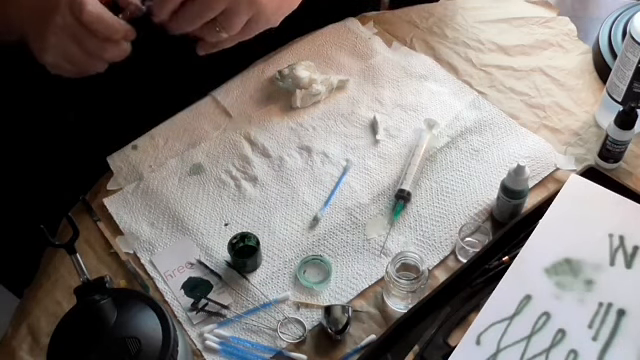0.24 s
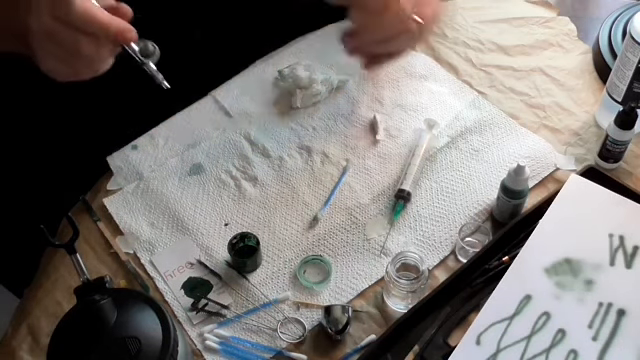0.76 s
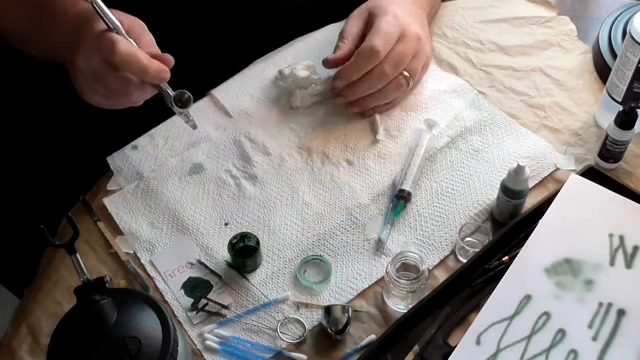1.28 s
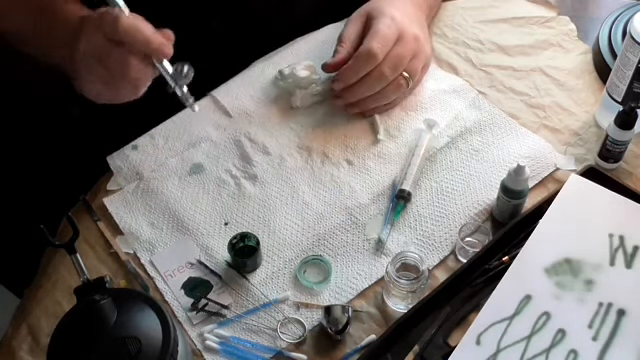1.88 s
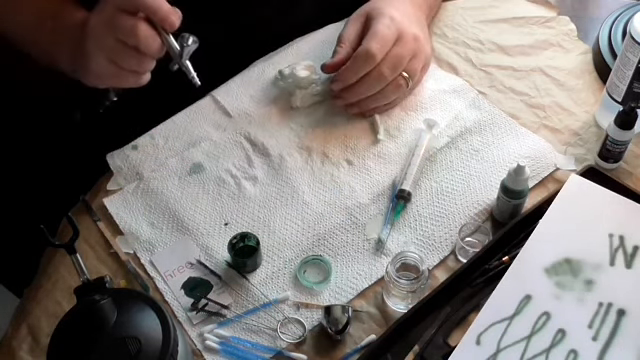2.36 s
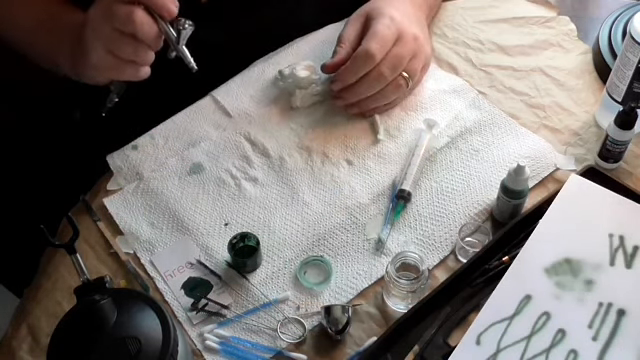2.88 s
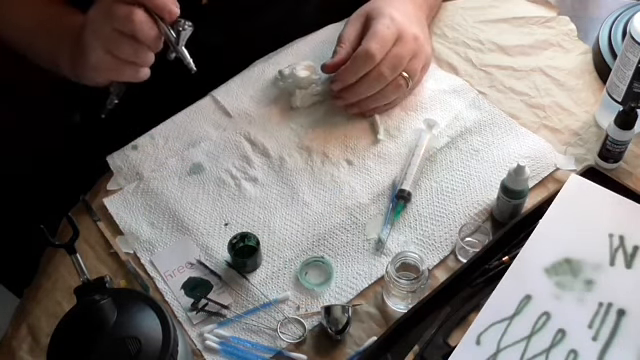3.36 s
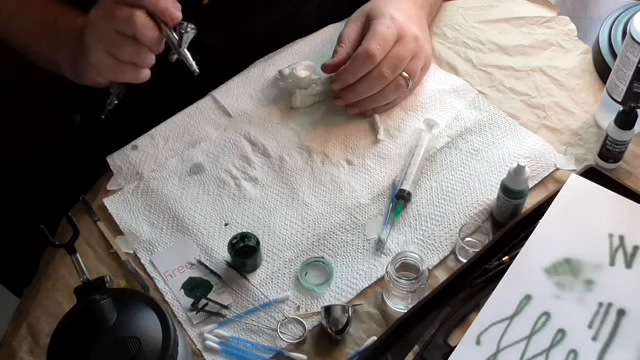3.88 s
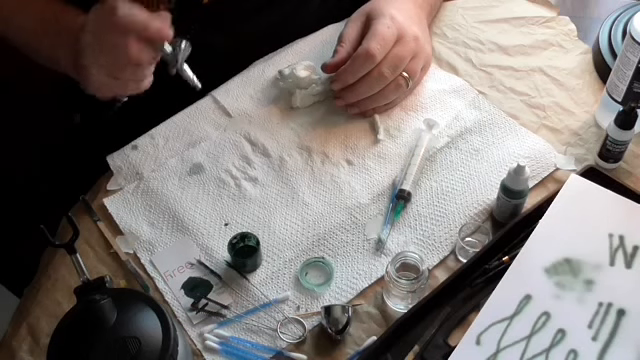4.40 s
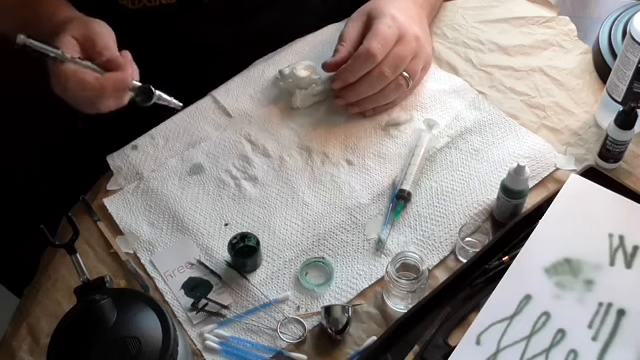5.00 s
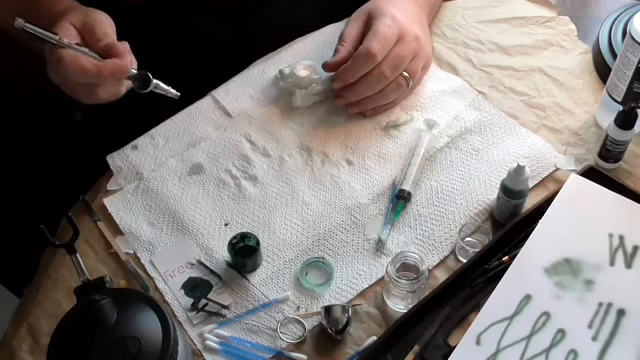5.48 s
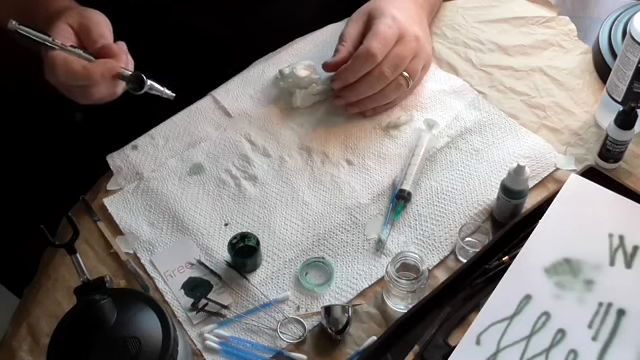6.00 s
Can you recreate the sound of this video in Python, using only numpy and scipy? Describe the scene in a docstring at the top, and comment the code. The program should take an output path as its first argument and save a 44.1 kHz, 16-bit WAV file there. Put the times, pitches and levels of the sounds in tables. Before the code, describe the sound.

Close stereo pickup at a hobby bench with faint low room rush. Metal parts click twice, a trigger clacks, and compressed air rushes out, first brushing paper with a duller undertone, then lifted away. A compressor hums and rattles rapidly below from just after the hiss starts, with faint fading whines. Two brief air breaks expose the motor before the hiss resumes to the end.

```python
"""A hobby bench in a small room: metal fittings click twice, then an airbrush trigger is pressed.
Filtered noise makes the jet, first at a paper towel, then off it, with two short breaks in the air.
Struck, damped metal makes the clicks; shaft multiples and valve puffs make a small piston compressor
that starts and chugs on underneath, with fading whines. Room noise and reflections surround it all."""
import sys
import numpy as np
from scipy import signal
from scipy.fft import rfft, irfft
from scipy.io import wavfile

SR = 44100
rng = np.random.default_rng(int(sys.argv[2]) if len(sys.argv) > 2 else 0)


def bounce(signal):
    """Save signal as a 16-bit WAV file at the path given by the first command-line argument."""
    frames = np.transpose(np.atleast_2d(signal))
    limited = np.clip(frames, -1, 1)
    pcm = np.round(limited * 32767).astype(np.int16)
    wavfile.write(sys.argv[1], SR, pcm)


N = 275625
TIME_S = np.arange(N) / SR
HZ = np.fft.rfftfreq(N, 1 / SR)


def gain_of(db):
    """Decibels to an amplitude factor."""
    return 10 ** (np.asarray(db) / 20)


def evened(x):
    """Scales to rms 1."""
    return x / np.sqrt(np.mean(x ** 2) + 1e-20)


def read(points, hz):
    """Interpolates a spectrum on a log-frequency axis."""
    point_hz, value = np.transpose(points)
    return np.interp(np.log(hz + 1), np.log(point_hz + 1), value)


def follow(rows):
    """Interpolates each column of a time curve at every sample."""
    row_s, *columns = np.transpose(rows)
    return [np.interp(TIME_S, row_s, column) for column in columns]


def noise(shape_db):
    """Gaussian noise of rms 1 with the given spectral shape."""
    spectrum = rfft(rng.standard_normal(N))
    return evened(irfft(spectrum * gain_of(shape_db), N))


def drift(rate_hz):
    """Smooth random curve of rms 1: noise under a Gaussian lowpass."""
    spectrum = rfft(rng.standard_normal(N))
    return evened(irfft(spectrum * np.exp(-(HZ / rate_hz) ** 2), N))


def placed(x, balance_db):
    """Level difference between the sides; positive is left."""
    return x * gain_of([[balance_db / 2], [-balance_db / 2]])


def swell(age):
    """Rises to 1 at age 1, then dies away."""
    return age * np.exp(1 - age)


# decay time of the room: pitch_hz, t60_s
ROOM_DECAY = [(150, 0.42), (1000, 0.29), (4200, 0.21), (8000, 0.18), (15000, 0.17)]


def room(x, size=16000, spacing=12):
    """Sparse reflections of random sign, separate for each side, the treble dying first."""
    taps = np.zeros((2, size))
    slots = np.arange(8 * spacing, size - spacing, spacing)
    at = slots + rng.integers(0, spacing, (2, len(slots)))
    np.put_along_axis(taps, at, rng.choice([-1., 1.], at.shape), 1)
    hz, age_s, bins = signal.stft(taps, SR, nperseg=256)
    decay = gain_of(-60 * age_s / read(ROOM_DECAY, hz)[:, None])
    tail = signal.istft(bins * decay, SR, nperseg=256)[1]
    return signal.fftconvolve(x[None], tail / np.linalg.norm(tail[0]), axes=1)[:, :N]


# spectral shape of the room's rush: pitch_hz, level_db
QUIET_SHAPE = [(15, -63), (25, -27), (70, -19), (92, -14), (145, -5.5), (242, -11), (285, -1.5),
               (427, -7.5), (754, -12.5), (2550, -32.5), (12200, -34.5), (16000, -41)]
# faint steady tones: pitch_hz, level_db
ROOM_TONES = [(100, -67), (274.5, -59.5)]


def room_noise(apart=0.93, rush_db=-56.0):
    """A low steady rush, partly separate for each side, with two faint phase-wavering tones."""
    shape_db = read(QUIET_SHAPE, HZ)
    shared = noise(shape_db)
    rush = shared + apart * np.array([noise(shape_db), noise(shape_db)])
    tones = np.zeros(N)
    for hz, db in ROOM_TONES:
        phase = 2 * np.pi * hz * TIME_S + 0.86 * drift(rate_hz=1.8)
        tones += np.sqrt(2) * gain_of(db) * np.sin(phase)
    return placed(gain_of(rush_db) * rush + tones, balance_db=-1.0)


def ringing(shape_db, size=2048):
    """Minimum-phase, hence causal, ring of energy 1 with the given spectral shape."""
    log_gain = np.log(gain_of(np.maximum(shape_db, shape_db.max() - 80)))
    mirrored = np.r_[log_gain, log_gain[-2:0:-1]]
    response = np.exp(np.conj(signal.hilbert(mirrored)))
    ring = np.fft.ifft(response).real[:size]
    return ring / np.linalg.norm(ring)


# fittings and trigger: start_s, level_db, hardness_0_to_1, body_db, scrape_s, room_db
CLICKS = [(0.041, -0.5, 1, 5, 0.0013, -0.5), (0.4028, -2.5, 0.08, -0.5, 0.0019, -3),
          (0.566, -27.5, 0.57, 31, 0.0064, -1), (0.8200, -25.5, 0.9, 22, 0.0044, 4.5),
          (0.862, -27, 0, 22, 0.0056, 4), (0.905, -7, 0.13, 8, 0.00042, -8)]
# metal snapping on metal, spectral shape: pitch_hz, level_db
SNAP_SHAPE = [(400, -30), (800, -15), (1700, -17), (2700, -15.5), (3800, -2), (5200, 1), (8000, -2.5),
              (11000, -4.5), (14500, -4), (16000, -15)]
# softer catch, damped by the hand, spectral shape: pitch_hz, level_db
CLACK_SHAPE = [(120, -32), (300, -2), (650, -12.5), (1300, -17), (1900, -13), (2800, -15.5), (3700, -10),
               (4700, -5), (6000, -19.5), (8600, -26), (10600, -17.5), (12000, -32), (16000, -33)]


def clicks(body_hz=2400, size=4096):
    """A blow and a brief scrape, as the part seats, ring the heavily damped metal."""
    age_s, hz = np.arange(size) / SR, np.fft.rfftfreq(size, 1 / SR)
    out, wet = np.zeros((2, N))
    for start_s, db, hardness, body_db, scrape_s, room_db in CLICKS:
        metal_db = hardness * read(SNAP_SHAPE, hz) + (1 - hardness) * read(CLACK_SHAPE, hz)
        metal_db += body_db / (1 + (hz / body_hz) ** 6)
        force = rng.standard_normal(size) * np.exp(-(age_s / scrape_s / 2) ** 2)
        force[0] += 2  # the blow
        # small parts radiate little bass directly
        direct_db = metal_db - 9 / (1 + (hz / 1700) ** 4)
        click = signal.fftconvolve(force / np.linalg.norm(force), ringing(direct_db))[:size]
        at = round(start_s * SR)
        out[at:][:size] += gain_of(db) * click
        # the room gathers all directions, so its tail keeps the full metal colour
        wet[at:][:size] += gain_of(db + room_db) * ringing(metal_db, size=size)
    return placed(out, balance_db=2.0) + room(wet)


# nozzle spits as the air comes on: start_s, peak_db_rms, rise_s
SPITS = [(0.896, -42, 0.0042), (3.605, -35, 0.0028), (5.132, -26.5, 0.0016)]
# spectral shape of a spit: pitch_hz, level_db
SPIT_SHAPE = [(2500, -32), (3600, -14), (4300, 8), (6200, 1), (7200, -21), (9000, -16), (16000, -24)]


def spits(room_db=-4.0):
    """A short swell of narrow-band noise at each opening of the valve."""
    burst = np.zeros(N)
    for start_s, db, rise_s in SPITS:
        burst += gain_of(db) * swell(np.maximum(TIME_S - start_s, 0) / rise_s)
    spit = burst * noise(read(SPIT_SHAPE, HZ))
    return spit + room(gain_of(room_db) * spit)


# trigger held down: press_s, release_s
TRIGGER = [(0.898, 3.520), (3.602, 5.012), (5.13, 6.4)]


def air_valve(open_s=0.016, empty_s=0.0019):
    """Air flow 0-1: the valve opens in a ramp and the nozzle empties exponentially after it shuts."""
    flow = np.zeros(N)
    for press_s, release_s in TRIGGER:
        opening = np.clip((TIME_S - press_s) / open_s, 0, 1)
        flow += opening * np.exp(-np.maximum(TIME_S - release_s, 0) / empty_s)
    return flow


SAG_DB, SAG_S = 5.5, 2.6


def pressure_db():
    """Hiss loss as line pressure sinks exponentially from the first press."""
    return SAG_DB * (np.exp(-np.maximum(TIME_S - TRIGGER[0][0], 0) / SAG_S) - 1)


# hiss swells and dips with the hand, before pressure sag and jet trim: time_s, level_db
JET = [(1.0, -35), (1.2, -32.5), (2.2, -33.5), (2.68, -34.7), (2.85, -33.5), (3.75, -33.5), (4.15, -34),
       (4.35, -32.5), (4.58, -33.7), (4.68, -36), (4.85, -34), (5.2, -34.5), (5.4, -32.5), (5.63, -37.2),
       (5.87, -32.5), (6.06, -37), (6.18, -33)]
# nozzle turning from the microphone: time_s, turned_away_0_to_1
AIM = [(1.12, 0), (1.35, .36), (2.4, 0), (2.62, 0.44), (4.4, 0.24), (4.75, 0.74)]
# spectral shape of the jet: pitch_hz, level_db
HISS_SHAPE = [(1060, -41), (1800, -20), (2100, -5), (2590, -12), (3290, -11.5), (3880, -1.5), (4920, 1),
              (5390, 3), (6240, 2), (7630, -2), (8440, 1), (9680, 0.5), (13900, -1.5), (15100, 0.5),
              (16000, -24)]
# the treble follows only a share of the hand's swells and dips
STEADY_DB, TREBLE_SHARE = -34, 0.46
# offset when facing, loss when fully turned away
NOZZLE_DB, NOZZLE_LOSS_DB = 2.5, 4
FIZZ_DB, FIZZ_LOSS_DB = 1.6, 0.5


def turbulence():
    """Jet noise in three bands that sink with the pressure; the treble beams with the aim."""
    body_db, away = follow(JET)[0], follow(AIM)[0]
    treble_db = STEADY_DB + TREBLE_SHARE * (body_db - STEADY_DB)
    nozzle_db = treble_db + NOZZLE_DB - NOZZLE_LOSS_DB * away
    fizz_db = treble_db + FIZZ_DB - FIZZ_LOSS_DB * away
    source = rfft(noise(read(HISS_SHAPE, HZ)))
    above_body = np.clip((HZ - 7400) / 800, 0, 1)
    above_nozzle = np.clip((HZ - 10000) / 1500, 0, 1)
    bands = [(body_db, 1 - above_body), (nozzle_db, above_body - above_nozzle), (fizz_db, above_nozzle)]
    sag_db = pressure_db()
    return sum(gain_of(db + sag_db) * evened(irfft(source * share, N)) for db, share in bands)


PAPER_NEAR_DB, PAPER_FAR_DB, LIFT_AT_S, LIFT_S = -42, -48, 2.08, .07


def on_paper_db():
    """Level of the rush on the paper: follows the pressure and drops as the brush is lifted."""
    lifted = .5 + .5 * np.tanh((TIME_S - LIFT_AT_S) / LIFT_S)
    return pressure_db() + PAPER_NEAR_DB + (PAPER_FAR_DB - PAPER_NEAR_DB) * lifted


# spectral shape of the jet striking paper: pitch_hz, level_db
PAPER_SHAPE = [(120, -27), (200, -8), (251, -21), (269, -15), (404, -15), (587, -8), (688, -12.5),
               (762, -9.5), (2040, -9.5), (3000, -21), (3900, -10), (6600, -120)]
# colour difference of the microphone ports, left over right: pitch_hz, level_db
PORT_BALANCE = [(60, -3.0), (92, -3.0), (140, -3.5), (210, -3.0), (330, -2.0), (500, -2.0), (770, -1.0),
                (1170, 0.5), (1790, 0.5), (2740, 1.0), (4190, 1.0), (6410, 0.5), (9810, -2.0), (15000, 1.0)]
# phase difference of the ports, left minus right: pitch_hz, phase_rad
PORT_PHASE = [(0, 0), (690, 0.5), (1290, 0.1), (1640, 0.2), (3880, 0.0), (8960, -0.2), (10600, 0.4),
              (11600, 0.5), (12600, 1.1), (16300, 0.2)]


def airbrush(jet_db=-1.55, flutter_db=0.54, room_db=-6.0, paper_room_db=-2.0):
    """Valve-gated, fluttering jet noise and its duller rush on the paper."""
    flow = air_valve() * gain_of(flutter_db * drift(rate_hz=32))
    # the jet is a long cloud of eddies: each side also hears a part of its own
    core, left, right = (flow * gain_of(jet_db) * turbulence() for _ in range(3))
    jet = core + .55 * np.array([left, right])
    paper = flow * gain_of(on_paper_db()) * noise(read(PAPER_SHAPE, HZ))
    heard = jet + paper + room(gain_of(room_db) * core + gain_of(paper_room_db) * paper)
    # half of each port difference goes to each side
    port = gain_of(read(PORT_BALANCE, HZ) / 2) * np.exp(.5j * read(PORT_PHASE, HZ))
    return irfft(rfft(heard) * np.array([port, 1 / port]), N)


MOTOR_ON_S = 1.193
TOP_HZ, START_SLOW_HZ, DRAG_HZ, SETTLE_S = 22.697, .5495, 1.876, 1.3


def shaft_speed():
    """Turns a second: slow approach to top speed; back pressure drags while the trigger is released."""
    paused = np.zeros(N)
    for held, held_next in zip(TRIGGER, TRIGGER[1:]):
        paused += (TIME_S > held[1]) * (TIME_S < held_next[0])
    keep = np.exp(-1 / (SETTLE_S * SR))
    drag = signal.lfilter([1 - keep], [1, -keep], paused)
    start_slow = np.exp(-np.maximum(TIME_S - MOTOR_ON_S, 0) / SETTLE_S)
    return TOP_HZ - START_SLOW_HZ * start_slow - DRAG_HZ * drag


# piston and valve knocks that set the drone's phases: turn_share, pitch_hz, swell_s, weight_db
KNOCKS = [(0.109, 688.3, 0.00236, -37.5), (0.131, 178, 0.0022, -35), (0.232, 470, 0.0011, -31.5),
          (0.218, 1002, 0.0012, -47), (.31, 1268, 0.0011, -38.5), (.38, 1275, 0.0022, -40.5),
          (.44, 1610, 0.0018, -47), (0.458, 774.7, 0.0021, -32.5), (.59, 677, 0.0019, -35),
          (0.763, 225, .0018, -35.5), (.83, 579, 0.000964, -26.5), (.96, 707.5, 0.0014, -33.5)]
# casing drone, relative level of shaft multiples: pitch_hz, level_db
CASING = [(22, -51), (68, -21), (113, -21.5), (180, -14), (245, -6.5), (293, -20.5), (360, -18),
          (385, -10.5), (540, -9.5), (760, -8.5), (900, -16.5)]
# the same for the higher multiples: pitch_hz, level_db
RATTLE = [(920, -23), (1050, -19), (1270, -10), (1400, -37), (1600, -15), (1750, -38)]
# multiples that meet a casing resonance: multiple, boost_db
BOOMS = [(6, 14), (14, 7), (31, 8.5)]


def drone(turns, mean_hz, count=76):
    """Multiples of the shaft speed, each phased by the knocks that feed it; rms 1."""
    cycle = np.linspace(0, 1, 4096)
    wave = np.zeros(len(cycle))
    for order in range(1, count):
        db = read(CASING + RATTLE, order * mean_hz) + dict(BOOMS).get(order, 0)
        fed = 0
        for share, hz, swell_s, knock_db in KNOCKS:
            response = swell_s / (1 + 2j * np.pi * (order * mean_hz - hz) * swell_s) ** 2
            fed += gain_of(knock_db) * np.exp(-2j * np.pi * order * share) * response
        wave += gain_of(db) * np.sin(2 * np.pi * order * cycle + np.angle(fed))
    return evened(np.interp(turns % 1, cycle, wave))


def boomy(casing, extra=0.64, settle_s=1.2, below_hz=170):
    """Adds low boom to the casing, strongest just after the start."""
    bass = irfft(rfft(casing) / (1 + (HZ / below_hz) ** 8), N)
    return casing + extra * np.exp(-abs(TIME_S - MOTOR_ON_S) / settle_s) * bass


# valve puffs in each turn, before load: turn_share, centre_hz, swell_s, peak_db_rms
PUFFS = [(.20, 995, 0.0029, -47.5), (.33, 1260, 0.0032, -44.5), (.40, 2200, 0.0011, -46),
         (.44, 1470, 0.0014, -51), (.46, 850, .002, -45), (.85, 737, 0.0026, -45.5)]


def rasps(turns, speed_hz):
    """The valves let through short puffs of band noise at fixed places in the turn."""
    out = np.zeros(N)
    for share, hz, swell_s, db in PUFFS:
        age = (turns - share) % 1 / speed_hz / swell_s
        band = signal.butter(2, [hz * .84, hz * 1.18], "bandpass", fs=SR, output="sos")
        out += gain_of(db) * swell(age) * evened(signal.sosfilt(band, rng.standard_normal(N)))
    return out


# spectral shape of air drawn through the compressor: pitch_hz, level_db
INTAKE_SHAPE = [(25, -26), (55, -15), (95, -2.5), (140, -4), (400, 2.5), (620, 6), (700, 5), (820, 1.5),
                (890, 5), (1000, -1), (1600, -0.5), (1850, -13), (2150, -6), (3000, -17), (6000, -12.5),
                (16000, -35)]


def compressor(drone_db=-40.0, uneven_db=.5, intake_db=-45.5, drone_room_db=-15.5, air_room_db=-3.0,
               start_s=0.032, load_db=3.0):
    """Every turn repeats the same drone cycle and puff timing, louder as the pressure builds."""
    speed_hz, on = shaft_speed(), TIME_S > MOTOR_ON_S
    turns = np.cumsum(speed_hz * on) / SR
    started = np.clip((TIME_S - MOTOR_ON_S) / start_s + .5, 0, 1)
    running = started * gain_of(-load_db * np.exp(-abs(TIME_S - MOTOR_ON_S)))
    uneven = gain_of(drone_db + uneven_db * drift(rate_hz=56))
    casing = running * on * uneven * boomy(drone(turns, speed_hz.mean()) * on)
    intake = gain_of(intake_db) * noise(read(INTAKE_SHAPE, HZ))
    air = running * (on * rasps(turns, speed_hz) + intake)
    # the drone reaches the right port 0.1 ms later and louder
    late = np.interp(TIME_S - .0001, TIME_S, casing)
    near = placed(np.array([casing, late]), balance_db=-3.5) + air
    return near + room(gain_of(drone_room_db) * casing + gain_of(air_room_db) * air)


# tones that start with the compressor: pitch_hz, level_db_rms, fade_db_per_s
WHINES = [(587, -52, 9), (889, -53, 2)]


def whine(waver_hz=5, rise_s=0.11):
    """Faint phase-wavering tones that come on with the compressor and fade as it settles."""
    age_s = np.maximum(TIME_S - MOTOR_ON_S, 0)
    tones = np.zeros(N)
    for hz, db, fade_db_per_s in WHINES:
        phase = 2 * np.pi * hz * TIME_S + drift(rate_hz=waver_hz)
        tones += gain_of(db - fade_db_per_s * age_s) * np.sin(phase)
    return np.sqrt(2) * np.minimum(age_s / rise_s, 1) * tones


def scene():
    """Everything at the bench."""
    return room_noise() + clicks() + spits() + airbrush() + compressor() + whine()


def record(dry, edge_hz=16000):
    """The recorder's band limit: a linear-phase lowpass."""
    lowpass = signal.firwin(401, edge_hz, window=("kaiser", 8), fs=SR)
    return signal.oaconvolve(dry, lowpass[None], "same")


dry = scene()
out = record(dry)
bounce(out)
```